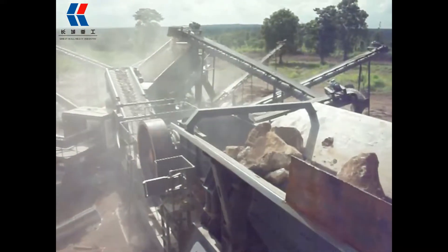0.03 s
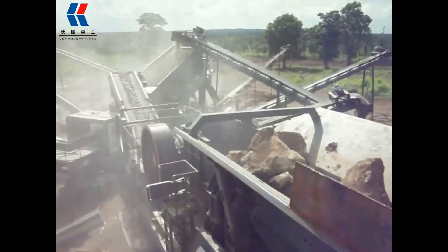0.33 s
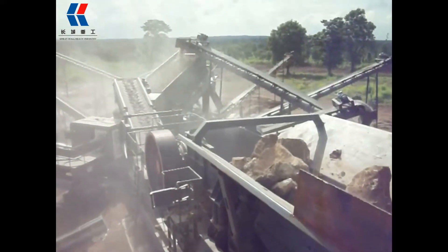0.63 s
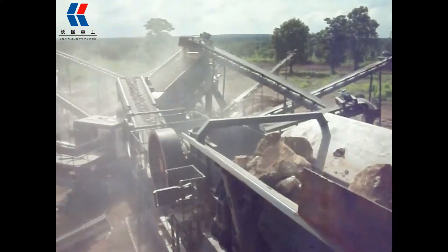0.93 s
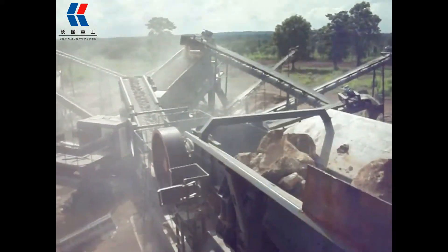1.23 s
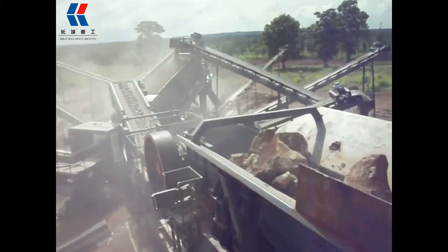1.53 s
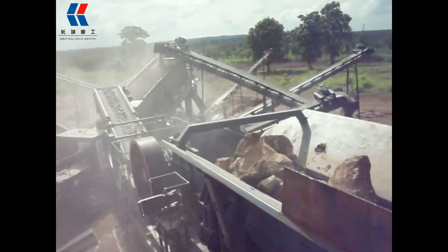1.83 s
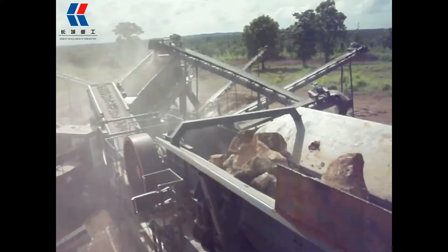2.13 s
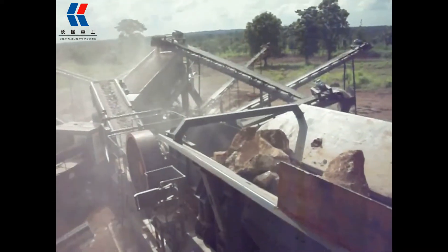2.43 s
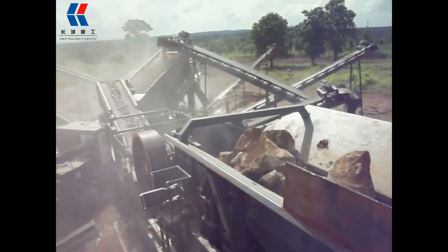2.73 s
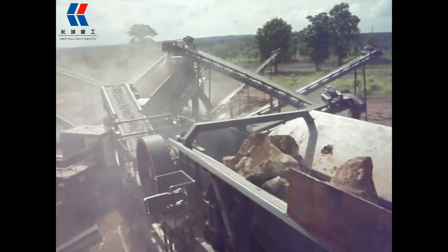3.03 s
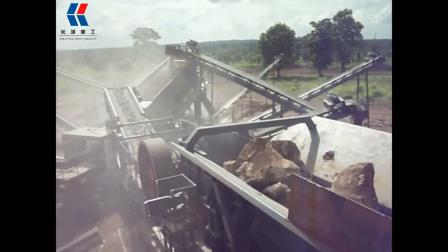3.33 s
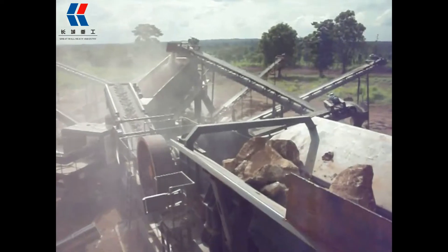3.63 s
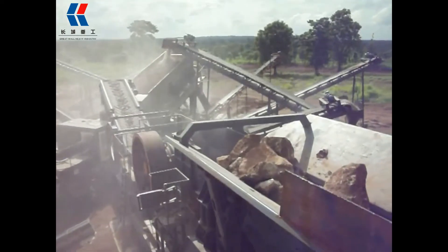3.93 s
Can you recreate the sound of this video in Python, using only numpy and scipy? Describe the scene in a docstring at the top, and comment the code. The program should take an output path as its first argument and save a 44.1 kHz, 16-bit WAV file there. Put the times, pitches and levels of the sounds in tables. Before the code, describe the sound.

Heavy rock crusher chewing boulders, with dull thuds, rattling gravel and a machine drone.

```python
"""Rock crusher at the feed hopper

A jaw chews about three times a second; its frame drones and boulders thud against it.
The steel hopper booms and knocks over a motor hum. Stones tumble, crack and clink on steel.
The sound is dull and limited, with one small click near the end."""
import sys
import numpy as np
from scipy import signal
from scipy.fft import rfft, irfft, next_fast_len
from scipy.io import wavfile
from scipy.ndimage import uniform_filter1d, map_coordinates

SR = 44100
rng = np.random.default_rng(int(sys.argv[2]) if len(sys.argv) > 2 else 0)


def generate_wav(signal):
    """Clip the signal to [-1, 1] and save it as 16-bit WAV at the path in sys.argv[1]."""
    frames = np.transpose(np.atleast_2d(signal))
    scaled = np.clip(frames, -1, 1) * 32767
    pcm = np.round(scaled).astype(np.int16)
    wavfile.write(sys.argv[1], SR, pcm)


N = 176400

# rock flow (time [s], gravel level [dB], stone level [dB])
ROCK_FLOW = [(0.0, -25.5, -18), (0.2, -33.5, -24.5), (0.41, -30, -22.5), (0.62, -30, -23),
             (0.67, -29.5, -23.5), (0.72, -29.5, -24.5), (0.85, -32, -21.5), (0.89, -34.5, -24),
             (0.97, -31, -23.0), (1.08, -29, -21.5), (1.13, -33.5, -27.5), (1.18, -28, -19.5),
             (1.23, -32.5, -25.5), (1.32, -30.5, -22.5), (1.59, -30.5, -24.0), (1.74, -27.5, -23.5),
             (1.82, -29.5, -20.5), (1.89, -28.5, -22), (1.96, -31, -26.5), (2.04, -30.5, -23),
             (2.11, -31, -20.5), (2.18, -31.0, -24.5), (2.36, -31, -21.5), (2.4, -32.5, -25),
             (2.48, -30.5, -21.5), (2.55, -31, -27), (2.6, -31, -21), (2.69, -31, -24.5), (2.83, -34, -21),
             (2.89, -33, -23), (3.08, -30, -23.5), (3.19, -30.5, -23), (3.48, -28.5, -22.5),
             (3.67, -32.5, -23), (3.74, -27, -21.5), (3.95, -30, -22), (4.0, -35, -25.5)]
# stone clatter (frequency [Hz], relative density [dB])
STONE_SPECTRUM = [(120, -24), (250, -3), (380, -0.5), (520, -0.5), (820, -0.5), (1050, -3.5), (1300, -6),
                  (1600, -14.5), (2400, -29), (5000, -52)]
# gravel rattle (frequency [Hz], relative density [dB])
GRAVEL_SPECTRUM = [(500, -46), (1100, -16), (1600, -0.5), (2000, -0.5), (2400, 0.5), (3000, -2.2),
                   (4050, -7), (4750, -8.5), (5200, -12.5), (5550, -18), (5850, -28), (6200, -46)]
# jaw rumble (frequency [Hz], relative density [dB])
JAW_SPECTRUM = [(12, -19.5), (25, -13), (42, -15), (55, 0.5), (85, -0.5), (115, -1), (190, .5), (225, -3),
                (275, -7), (350, -15.5), (600, -26.5), (1500, -62)]
# motor hum (frequency [Hz], level [dB])
MOTOR_LINES = [(52.2, -42.5), (104.5, -28.5)]
# heavy rocks shifting in the hopper (peak time [s], relative level [dB], 1/e half-width [s])
HOPPER_BOOMS = [(0.142, -18, 0.2), (0.446, -17.5, 0.026), (.71, -16, 0.057), (1.352, -21, 0.041),
                (1.593, -18, 0.057), (2.30, -12.5, 0.039), (2.945, -22.5, .045), (3.207, -16.5, 0.057),
                (3.515, -19, 0.054), (3.796, -12, 0.085)]
# rocks on the hopper wall (time [s], level [dB], pitch [Hz])
WALL_KNOCKS = [(0.254, -16.5, 338), (.353, -24, 261.5), (.493, -22, 338), (0.666, -12, 355),
               (1.091, -16.5, 400), (1.234, -16, 296.5), (2.355, -13.5, 288.4), (2.514, -14, 270),
               (2.681, -15.5, 282), (3.106, -19.5, 292)]
# rocks cracking (time [s], relative level [dB], centre [Hz], t60 [s])
ROCK_CRACKS = [(.003, -18.5, 3570, 0.066), (0.2445, -15, 1110, 0.094), (0.297, -16, 1720, 0.041),
               (0.352, -20.5, 2920, 0.024), (0.405, -16, 1150, 0.091), (0.66, -25.5, 2390, 0.071),
               (.810, -18, 1310, 0.035), (0.851, -11, 762, 0.07), (0.95, -21.5, 2990, 0.051),
               (1.027, -27, 2880, 0.18), (1.092, -20.5, 2180, 0.032), (1.169, -21.5, 1520, 0.093),
               (1.336, -22.5, 2400, 0.072), (1.625, -15, 1500, 0.024), (1.689, -26.5, 2640, 0.16),
               (1.729, -18, 2270, 0.11), (1.795, -22.5, 2150, 0.068), (2.029, -15.5, 1050, 0.065),
               (2.353, -15.5, 1520, 0.054), (2.59, -18, 1230, 0.035), (2.733, -20, 2230, 0.25),
               (2.81, -22, 1950, 0.14), (2.936, -23.5, 3060, 0.04), (3.069, -15.5, 1440, 0.052),
               (3.219, -19.5, 2010, 0.087), (3.481, -22.5, 1710, 0.2), (3.619, -17, 1645, .06),
               (3.954, -13, 883, 0.076)]
# stones on steel (time [s], level [dB], pitch [Hz], t60 [s])
STEEL_CLINKS = [(.951, -32, 4660, .08), (1.049, -23.5, 2300, 0.16), (1.649, -23, 4650, .04),
                (2.824, -21.5, 2220, 0.089), (3.106, -32, 4700, 0.071), (3.738, -36, 4930, 0.12),
                (3.745, -30, 4720, 0.16)]
# boulders on the jaw (time [s], level [dB])
BOULDER_THUDS = [(0.056, 1.5), (.145, -10.5), (0.262, -8.5), (.574, -5), (.731, -9), (1.115, -1.5),
                 (1.238, -4), (1.351, -2), (1.626, -8.5), (1.744, -8.5), (2.097, 1), (2.501, -7.5),
                 (2.757, -7.5), (2.941, -11.5), (3.116, -10)]
# load on the jaw (time [s], rumble level [dB])
JAW_LOAD = [(0, -13.5), (.12, -19), (.55, -20.5), (.75, -22.5), (1.05, -21), (1.17, -22), (1.25, -18.5),
            (1.65, -20.5), (2.1, -18), (2.55, -19), (3.2, -18.5), (3.55, -20.5), (4, -15.5)]
# frame throbs (peak time [s], level [dB], 1/e half-width [s])
FRAME_THROBS = [(.03, -20.5, 0.035), (.31, -17.5, 0.067), (.6, -18, 0.038), (.885, -14, 0.031),
                (1.225, -22, 0.021), (1.37, -17, 0.022), (1.96, -15.5, 0.03), (2.1, -16.5, 0.025),
                (2.385, -13.5, 0.014), (2.49, -18.5, 0.047), (2.76, -18, 0.018), (3.18, -23, 0.015),
                (3.675, -16, 0.039)]

STONES_DB, BOOM_DB, CRACK_DB = -0.12, -1, -3
HOPPER_HZ, HOPPER_WIDTH_HZ = 64.2, 13
KNOCK_T60_S, KNOCK_WIDTH_HZ = 0.089, 150
SNAP_HZ, SNAP_DB, SNAP_T60_S = 3700, -9.5, 0.047
CLINK_WIDTH_HZ, ATTACK_S = 250, 0.0009
THUD_HZ, THUD_T60_S = 185, 0.017
STROKE_PERIOD_S, JAW_CLOSED_S, STROKE_SWING_DB = 0.307, 0.41, 0.85
FRAME_HZ, FRAME_WIDTH_HZ, FRAME_IDLE_DB = 140.2, 22, -29
CLICK_S, CLICK_DB, CLICK_DECAY_S = 3.4233, -11, 0.0034
CRACK_TOP_HZ, PLANT_TOP_HZ, OUTPUT_TOP_HZ = 5300, 6040, 15800
LIMIT_DB, LIMIT_WINDOW_S, DRIVE_DB = -14.5, 0.028, 1.18


def amp(db):
    """Decibels to gain."""
    return 10 ** (np.asarray(db) / 20)


def unit(x):
    """Scale to rms 1."""
    return x / np.sqrt(np.mean(x ** 2) + 1e-20)


def clock():
    """Sample times in seconds."""
    return np.arange(N) / SR


def curves(rows):
    """Per-sample curve for each column after the time."""
    times_s, *columns = np.transpose(rows)
    return [np.interp(clock(), times_s, column) for column in columns]


def wobble(knots_per_s):
    """Smooth random curve."""
    return map_coordinates(rng.standard_normal(2000), [clock() * knots_per_s], mode="wrap")


def swells(rows):
    """Sum of Gaussian envelopes."""
    return sum(amp(db) * np.exp(-((clock() - peak_s) / half_s) ** 2) for peak_s, db, half_s in rows)


def struck(start_s, t60_s):
    """Envelope: quick rise, exponential decay."""
    t = np.maximum(clock() - start_s, 0)
    return (1 - np.exp(-t / ATTACK_S)) * amp(-60 * t / t60_s)


def filtered(x, response):
    """Apply a frequency response."""
    size = next_fast_len(N + SR // 2)
    return irfft(rfft(x, size) * response(np.fft.rfftfreq(size, 1 / SR)), size)[:N]


def coloured(x, spectrum):
    """Shape x by a spectrum table; rms 1."""
    knots_hz, db = np.transpose(spectrum)
    return unit(filtered(x, lambda hz: amp(np.interp(np.log(hz + 1), np.log(knots_hz), db))))


def resonance(centre_hz, width_hz):
    """Noise through a steep-sided resonance; rms 1."""
    peak = lambda hz: 1j * hz * width_hz / (centre_hz ** 2 - hz ** 2 + 1j * hz * width_hz)
    return unit(filtered(rng.standard_normal(N), lambda hz: peak(hz) ** 2))


def ringing(centre_hz, width_hz, steadiness):
    """Resonance fed by many blows: phase wanders, steadiness (0-1) evens the envelope."""
    analytic = signal.hilbert(resonance(centre_hz, width_hz))
    return unit(analytic.real / (abs(analytic) + 1e-3) ** steadiness)


def impacts(per_s, scatter_db, t60_s, kinds=12):
    """Random collisions; each kind of stone has its own short ring."""
    t = np.arange(SR // 10) / SR
    out = np.zeros(N)
    for _ in range(kinds):
        hits = rng.random(N) < per_s / kinds / SR
        strength = amp(scatter_db * np.clip(rng.standard_normal(N), -2, 2))
        ring = rng.standard_normal(len(t)) * amp(-60 * t / t60_s)
        out += signal.oaconvolve(hits * strength, ring)[:N]
    return unit(out)


def click():
    """One dry click: a sudden jump that relaxes at once."""
    t = clock() - CLICK_S
    return amp(CLICK_DB) * np.sign(t) * np.exp(-abs(t) / CLICK_DECAY_S)


def motor():
    """The drive hums on two slightly unsteady lines."""
    t = clock() + 0.00056 * wobble(5.8)
    return sum(amp(db) * np.sqrt(2) * np.sin(2 * np.pi * (hz * t + rng.random()))
               for hz, db in MOTOR_LINES)


def tumbling_rock():
    """Stones and gravel collide in shared clumps over the blur of distant screens."""
    gravel_db, stones_db = curves(ROCK_FLOW)
    clumps_db = wobble(60)
    shared = impacts(per_s=1100, scatter_db=2.5, t60_s=0.013)
    clatter = amp(-2) * impacts(per_s=450, scatter_db=2, t60_s=0.039, kinds=24)
    screens = amp(-2) * rng.standard_normal(N)
    rattle = amp(1.5) * impacts(per_s=1100, scatter_db=0.5, t60_s=0.035, kinds=24)
    stones = amp(STONES_DB + stones_db) * coloured(shared + clatter + screens, STONE_SPECTRUM)
    gravel = amp(gravel_db) * coloured(shared + rattle, GRAVEL_SPECTRUM)
    return amp(clumps_db) * (stones + gravel)


def hopper():
    """The steel hopper booms as its load shifts; rocks knock hollowly on its wall."""
    boom = amp(BOOM_DB) * swells(HOPPER_BOOMS) * ringing(HOPPER_HZ, HOPPER_WIDTH_HZ, steadiness=0.51)
    knocks = sum(amp(db) * struck(start_s, KNOCK_T60_S) * ringing(hz, KNOCK_WIDTH_HZ, steadiness=1)
                 for start_s, db, hz in WALL_KNOCKS)
    return boom + knocks


def breaking_rock():
    """Each crack is a bright snap and a burst of splinters; some stones ring on steel plates."""
    splinters = unit(amp(1.1 * wobble(550)))
    cracks = sum(amp(db) * struck(start_s, t60_s) * ringing(hz, 0.81 * hz, steadiness=0.8)
                 for start_s, db, hz, t60_s in ROCK_CRACKS)
    snap_envelope = sum(amp(db) * struck(start_s, SNAP_T60_S) for start_s, db, _, _ in ROCK_CRACKS)
    snaps = snap_envelope * resonance(SNAP_HZ, 2.1 * SNAP_HZ)
    clinks = sum(amp(db) * struck(start_s, t60_s) * ringing(hz, CLINK_WIDTH_HZ, steadiness=0.5)
                 for start_s, db, hz, t60_s in STEEL_CLINKS)
    mix = amp(CRACK_DB) * splinters * cracks + amp(SNAP_DB) * snaps + clinks
    return filtered(mix, lambda hz: 1 / (1 + (hz / CRACK_TOP_HZ) ** 28))


def boulders():
    """Each blow on the jaw is one dull push that barely rings."""
    t = np.arange(SR // 20) / SR
    out = np.zeros(N + SR)
    for start_s, db in BOULDER_THUDS:
        pitch_hz = THUD_HZ * np.exp(0.074 * rng.standard_normal())
        thud = amp(db - 60 * t / THUD_T60_S) * np.sin(2 * np.pi * pitch_hz * t)
        out[round(start_s * SR):][:len(t)] += thud
    return out[:N]


def crusher():
    """Dull knocks swell with each jaw closing; the frame drones, and throbs on bites."""
    load_db, = curves(JAW_LOAD)
    stroke_db = STROKE_SWING_DB * np.cos(2 * np.pi * (clock() - JAW_CLOSED_S) / STROKE_PERIOD_S)
    knocks = impacts(per_s=770, scatter_db=1.5, t60_s=0.025)
    rumble = coloured(knocks + rng.standard_normal(N), JAW_SPECTRUM)
    frame_envelope = amp(FRAME_IDLE_DB) + swells(FRAME_THROBS)
    frame = frame_envelope * ringing(FRAME_HZ, FRAME_WIDTH_HZ, steadiness=1)
    return amp(load_db + stroke_db) * rumble + frame


def scene():
    """Low-passed plant plus the click; mono."""
    plant = crusher() + boulders() + hopper() + motor() + tumbling_rock() + breaking_rock()
    return (filtered(plant, lambda hz: hz < PLANT_TOP_HZ) + click())[None]


def record(dry):
    """A fast, soft limiter ducks everything under the bass peaks; then a low-pass."""
    driven = amp(DRIVE_DB) * dry[0]
    window = int(LIMIT_WINDOW_S * SR)
    power = abs(uniform_filter1d(uniform_filter1d(driven ** 2, window), window // 2))
    gain = 1 / np.sqrt(np.hypot(1, power / amp(LIMIT_DB) ** 2))
    return filtered(driven * gain, lambda hz: 1 / (1 + (hz / OUTPUT_TOP_HZ) ** 100))[None]


dry = scene()
out = record(dry)
generate_wav(out)
```